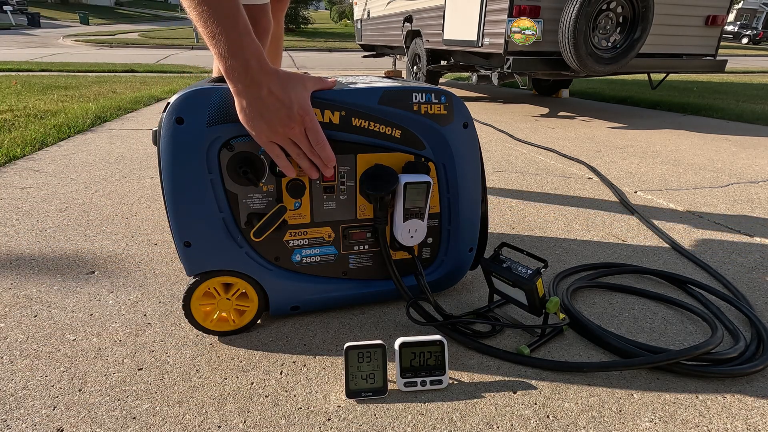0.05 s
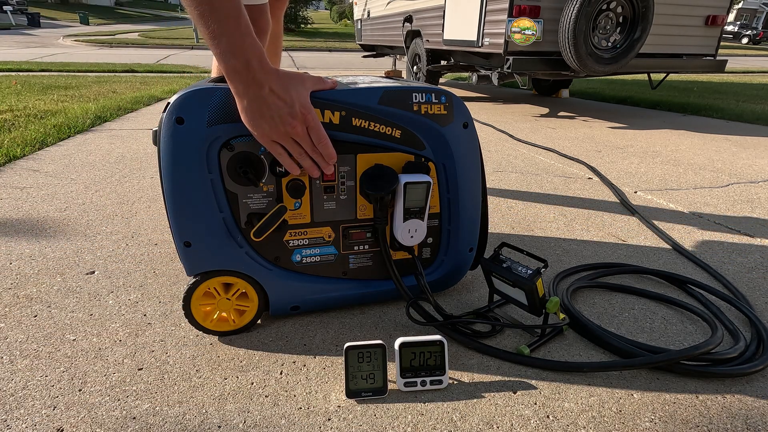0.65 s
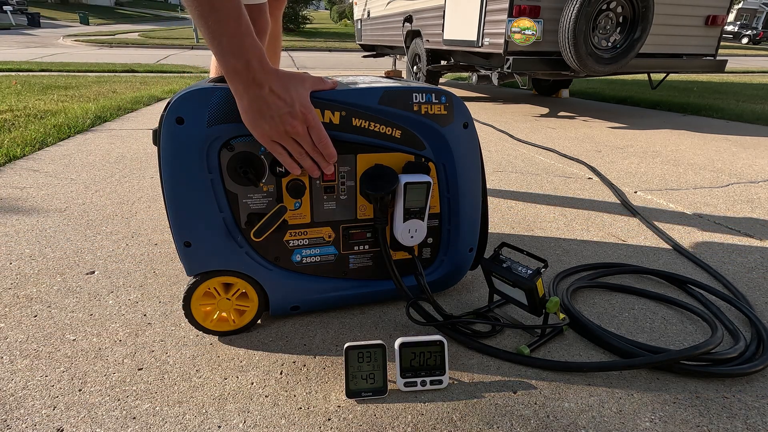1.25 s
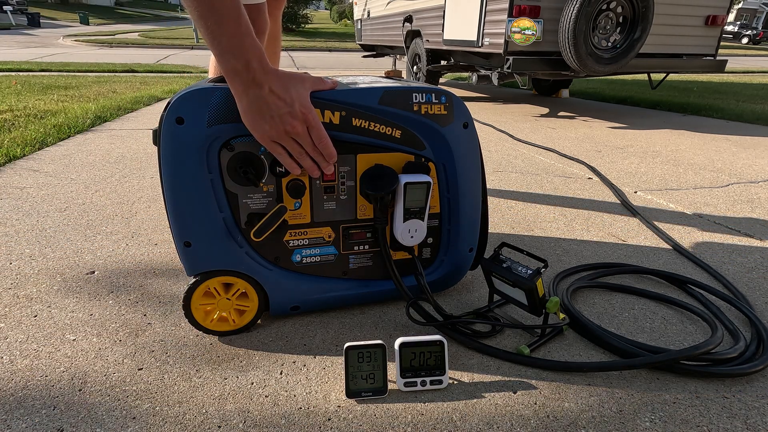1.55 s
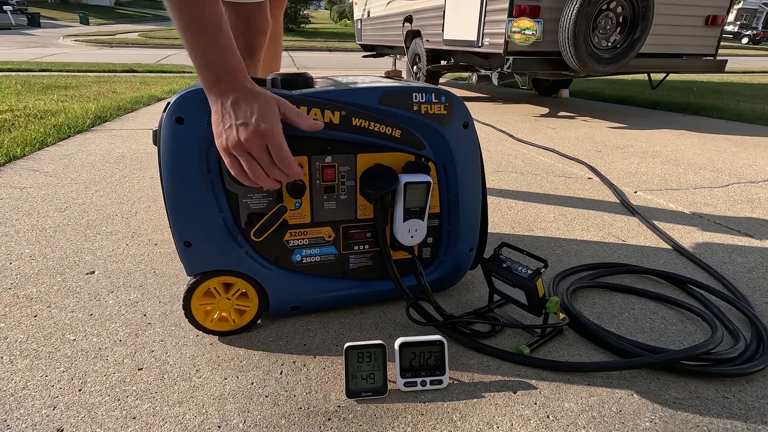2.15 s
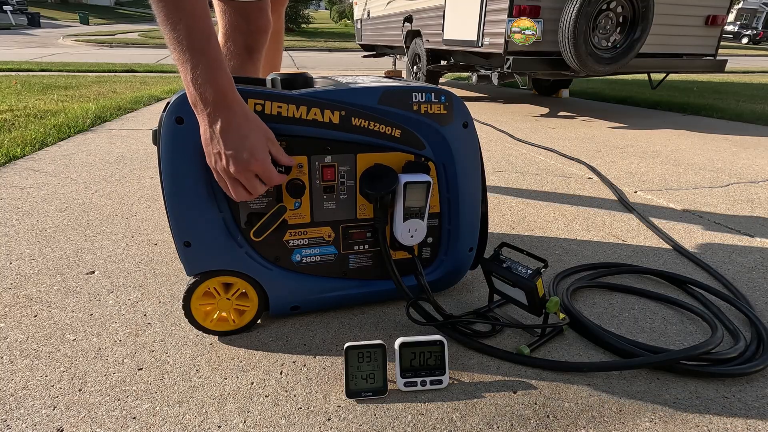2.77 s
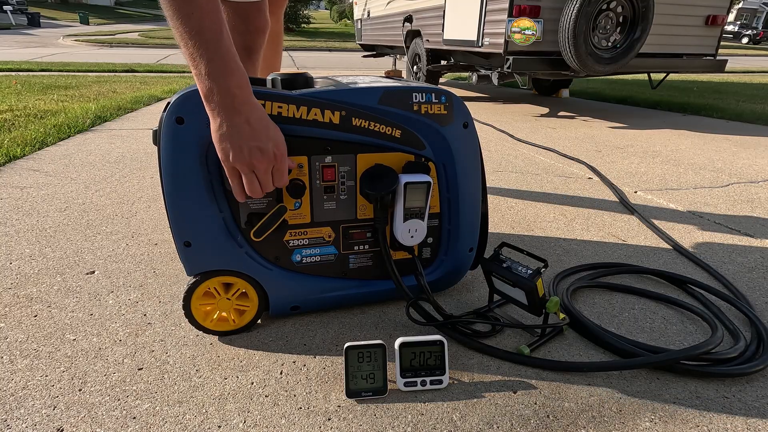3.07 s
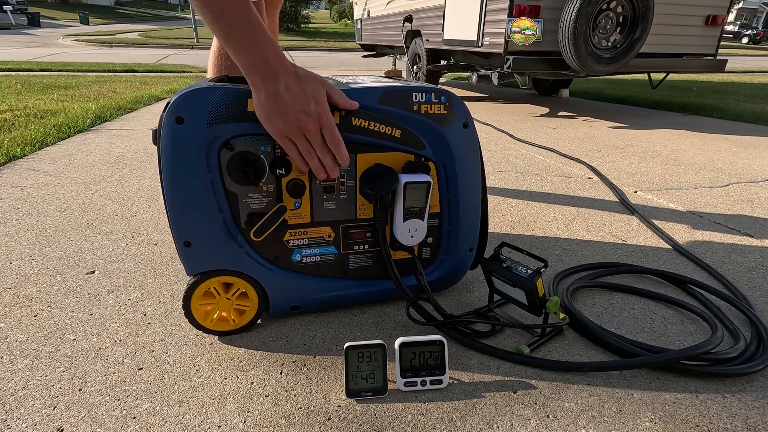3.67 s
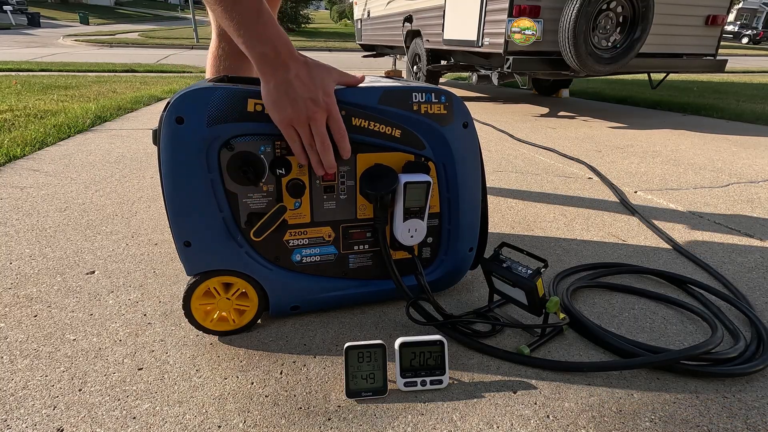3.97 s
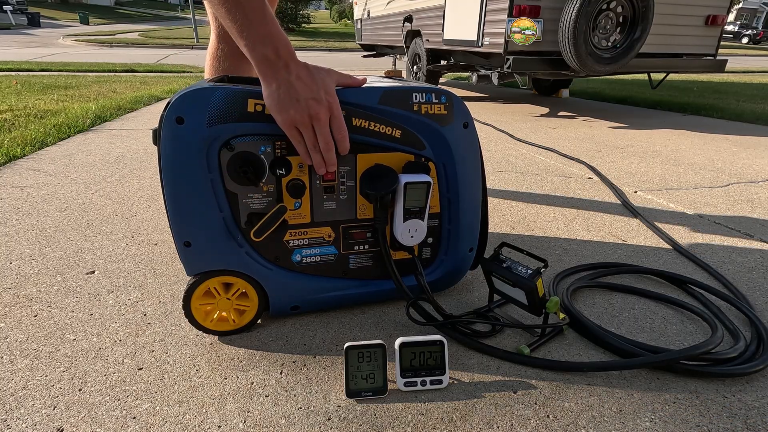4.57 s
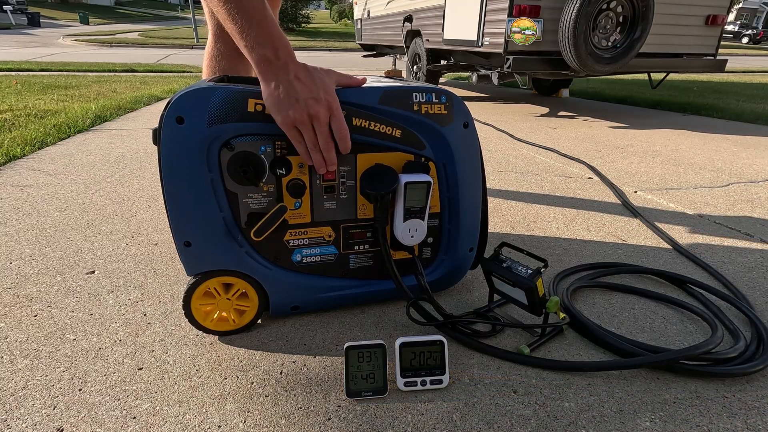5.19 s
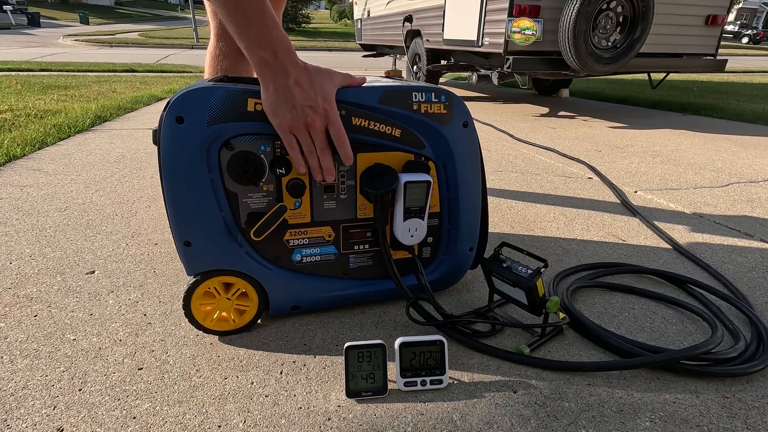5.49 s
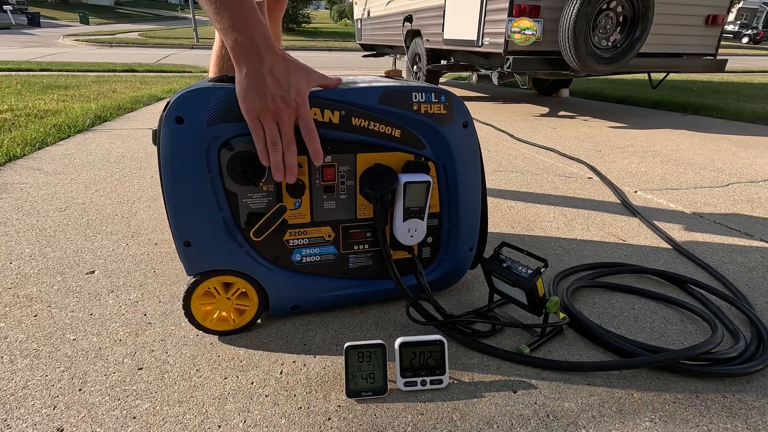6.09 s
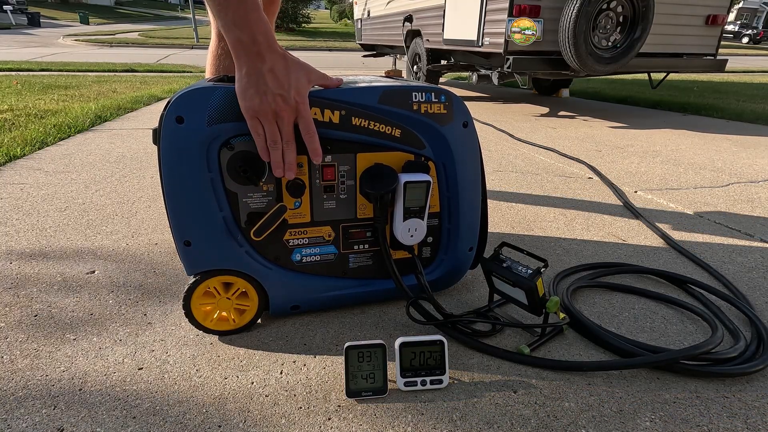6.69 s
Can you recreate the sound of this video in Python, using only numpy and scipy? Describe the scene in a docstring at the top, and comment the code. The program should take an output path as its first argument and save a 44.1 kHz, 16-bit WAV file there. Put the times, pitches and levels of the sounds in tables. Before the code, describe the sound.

A quiet outdoor hush opens the scene. At about 0.6 seconds a relay clicks and an electric starter engages with a knock, whining and rattling as it cranks a portable generator. The engine does not fire. The starter drops out around 2.1 seconds and the engine coasts down with slowing hollow puffs, soft thumps and valve clacks, stopping at about 4.2 seconds. Light wind gusts rumble on the microphone meanwhile, strongest near 3.3 seconds. At 4.5 seconds there is another click and knock, and the starter cranks again. The engine catches at about 5.2 seconds, with uneven exhaust pops until nearly 6 seconds, and settles briefly into a thumping idle with a light mechanical clatter. At 6.3 seconds a switch clicks and the engine speeds up, still running at the end, near 7 seconds.

```python
"""Out of a quiet outdoor hush a relay clicks and an electric starter whines and rattles, cranking a portable
four-stroke generator on a driveway. It fails to fire and coasts to a halt, puffing, as light gusts rumble.
At the second try it catches, pops and idles; a switch clicks and it speeds up. One crank angle times the
gas pulses that thump in the muffler, and the valve clacks and gear teeth that ring the housing."""
import sys
import numpy as np
from scipy import signal
from scipy.fft import rfft, irfft, next_fast_len
from scipy.io import wavfile
from scipy.ndimage import map_coordinates

SR = 44100
rng = np.random.default_rng(int(sys.argv[2]) if len(sys.argv) > 2 else 0)


def transcribe(signal):
    """Save signal, clipped to [-1, 1], as a 16-bit WAV file at the path in sys.argv[1]."""
    frames = np.atleast_2d(signal).T
    limited = np.clip(frames, -1, 1)
    pcm = np.round(limited * 32767).astype(np.int16)
    wavfile.write(sys.argv[1], SR, pcm)


N = 301644
TIME = np.arange(N) / SR

# the neighbourhood's steady hush: (frequency [Hz], density [dB])
HUSH_TONE = [(25, -4.5), (90, -4), (140, -4.5), (250, -16.5), (350, -17.5), (450, -25), (600, -24),
             (850, -31), (1400, -24.5), (2300, -29.5), (5400, -36.5), (8500, -44), (11500, -53.5),
             (15000, -55)]
# low rumble of breeze and engine: (frequency [Hz], density [dB])
RUMBLE_TONE = [(12, -16), (20, 1), (47, 1), (158, -7), (295, -16), (343, -15), (468, -28), (700, -35),
               (910, -62), (1540, -120)]
# wind buffeting a microphone port: (frequency [Hz], density [dB])
GUST_TONE = [(12, -38), (20, -1), (65, -0.5), (246, -7.5), (416, -18), (888, -38), (1500, -34), (1950, -70),
             (3300, -120)]
# gusts: (time [s], level [dB], rise [s], t60 [s])
WIND_GUSTS = [(2.38, -46, 0.051, 0.71), (2.85, -57.5, 0.11, 2.3), (3.26, -35.5, 0.013, 1.57),
              (3.42, -40.5, .03, 0.9), (3.59, -46, .03, 0.66), (4.38, -42.5, 0.033, 1.1)]
# deep swell of the breeze: (frequency [Hz], density [dB])
SWELL_TONE = [(12, -20), (25, 6), (55, 4), (150, -8.5), (400, -52)]

# resonances of the engine and its housing: (frequency [Hz], width [Hz], lift at full ring [dB])
HOUSING_MODES = [(531.5, 42, 8.5), (619.7, 16, 13), (735.5, 29, 7.5), (1064, 52, 9), (1266, 56, 11.5),
                 (1521, 109, 9.5), (1878, 66, 5.5), (2025, 57, 5.5), (2351, 53, 11.5), (2670, 25, 2),
                 (2785, 58, 5.5), (2871, 64, 9), (3040, 62, 9), (3295, 50, -7.5), (3410, 94, 7),
                 (3680, 124, 6)]
# crank, coast to a halt, crank again, idle, speed up: (time [s], speed [cycles/s])
ENGINE_SPEED = [(0.66, 0.0), (0.8, 2.96), (1.05, 5.53), (1.3, 7.01), (1.95, 8.59), (2.31, 7.39),
                (3.47, 3.8), (4.21, 0.0), (4.5, 0.0), (4.62, 2.94), (5.13, 7.82), (5.39, 12.94),
                (5.71, 17.86), (6.03, 17.25), (6.4, 18.58), (6.84, 29.02)]
# blend of engine states: (time [s], drive [0 cranked, 1 idling, 2 and up accelerating])
ENGINE_DRIVE = [(5.03, 0.32), (5.25, 0.44), (5.6, 0.94), (6.29, 1.04), (6.35, 2.8)]
# force of combustion: (time [s], load [dB over a quiet idle])
ENGINE_LOAD = [(5.0, 7.5), (5.26, 14.5), (5.42, 7), (5.72, 6.5), (5.92, 1), (6.28, 1), (6.5, 5.5),
               (6.84, 5)]

# relay and switch clicks: (time [s], level [dB], t60 [s])
SWITCH_CLICKS = [(0.64, -36, 0.032), (.652, -38, 0.1), (4.474, -34, 0.026), (4.486, -42.5, 0.25),
                 (6.309, -33, 0.042)]
# colour of a click: (frequency [Hz], gain [dB])
CLICK_TONE = [(150, -6), (700, -1.5), (1500, 2.5), (3000, 0), (5000, -11.5), (9000, -25), (14500, -28)]
# the starter gear slams in, is thrown about, drops out: (time [s], rattle [dB], t60 [s], knock [dB])
GEAR_JOLTS = [(0.662, -33.5, 0.2, -28.5), (0.69, -55, 0.055, -41), (1.824, -32, 0.043, -50),
              (1.95, -32, .06, -50), (2.058, -41, .06, -56), (4.502, -34.5, 0.19, -30.5),
              (4.525, -49, 0.09, -43), (5.139, -32.5, 0.067, -38.5)]
# dull body of a jolt: (frequency [Hz], gain [dB])
KNOCK_TONE = [(40, -35.5), (170, 3.5), (350, -6.5), (700, -9), (1100, -11.5), (2500, -47), (8000, -82)]
# last air let out as the piston stops and rocks back: (time [s], hiss [dB], width [s], hollow ring [dB])
PISTON_SIGHS = [(3.995, -63.5, 0.02, -71), (4.245, -64, 0.024, -66)]
# hollow ring of a puff: (frequency [Hz], density [dB])
HOLLOW_TONE = [(600, -75), (880, -22), (1010, 16), (1150, 5), (1700, -48)]
# valve clacks of one cycle: (angle [cycles], t60 [s], unfired level [dB], running level [dB])
VALVE_CLACKS = [(.267, .055, -39.5, -58.5), (.447, .05, -52, -58.5), (.512, 0.064, -48, -60),
                (.625, .06, -51, -57), (.79, 0.07, -52, -57.5)]
# colour of a valve's clack and hiss: (frequency [Hz], gain [dB])
VALVE_TONE = [(300, -27), (600, -12), (1050, -0.5), (1550, -1.5), (2050, -3.5), (3000, -6), (3900, -11.5),
              (5300, -20), (6800, -23.5), (8500, -41), (11000, -47), (14500, -70)]
# colour of the fine clatter: (frequency [Hz], gain [dB])
CLATTER_TONE = [(260, -25.5), (480, -7), (850, -2), (1100, -2.5), (1520, -4), (1900, -8.5), (3000, -10),
                (3900, -13.5), (5300, -25.5), (7500, -26.5), (11000, -37.5), (14500, -60)]

# the starter is powered: (on [s], off [s], level [dB], spin-down level [dB])
STARTER_RUNS = [(.665, 2.108, -36, -60), (4.496, 5.15, -37, -46)]
# the gears go slack as the piston passes its top: (angle [cycles], loudness [relative])
GEAR_THROB = [(.05, -0.84), (.13, 1), (.38, -0.78), (.45, 0.73), (.55, 0.46), (.7, 0.88), (.92, -1.85)]
# colour of the gear rattle: (frequency [Hz], gain [dB])
RATTLE_TONE = [(100, -20), (300, -13.5), (520, -2), (850, -1), (1300, -2), (2200, 0), (3300, 1), (3900, 1),
               (4400, -7), (5100, -17), (6500, -15.5), (8400, -22), (10000, -26), (14500, -43)]
# the starter gear's own ring: (frequency [Hz], density [dB])
SING_TONE = [(3000, -37), (3500, -8), (3690, 3), (3880, -13), (4300, -56), (5600, -39), (6450, -17),
             (7600, -37), (9800, -25.5), (14000, -46)]
# how the housing radiates the whine: (frequency [Hz], gain [dB])
WHINE_COLOUR = [(170, 0.5), (450, -3), (660, 5), (820, -3), (1250, 2.5), (15000, -3)]

# gas pulses: crankcase push, firing, exhaust, its overtone, muffler ring, intake, valve closing
# (angle [cycles], ring [Hz], t60 [s], polarity [sign], cranked [dB], idling [dB], accelerating [dB])
GAS_PULSES = [(-.015, 61.1, 0.029, 1, 0.5, -16, -14), (-.028, 166, .022, -1, -44, 5, 6.5),
              (.26, 181, .018, -1, 7, -14.5, 3.5), (.256, 316.6, 0.037, -1, -35, -20.5, -6.5),
              (.305, 211, 0.069, -1, -23, -7, -10.5), (.56, 110, .03, 1, -5, -16.5, -30),
              (0.658, 160, 0.029, 1, -37, -0.5, -2.5)]
# rush of exhaust gas: (frequency [Hz], density [dB])
RUSH_TONE = [(30, -14), (120, -10), (210, 9), (320, -8), (500, -9.5), (800, -15.5), (1600, -33.5),
             (6000, -74)]
# uneven firing pops in the exhaust: (time [s], level [dB])
EXHAUST_POPS = [(5.21, -31.5), (5.3, -32), (5.462, -42), (5.539, -39), (5.608, -37), (5.68, -27),
                (5.746, -29.5), (5.807, -34), (5.863, -39)]
# colour of a pop: (frequency [Hz], density [dB])
POP_TONE = [(200, -27), (420, 8), (560, 4), (760, -2.5), (1000, -16), (1600, -32), (3000, -16.5),
            (12000, -77)]

# stereo spread of the scatter: (frequency [Hz], side gain [dB])
SCATTER_TONE = [(30, -23), (200, -28.5), (500, -13.5), (1000, -12), (2000, -8), (4000, -4), (8000, 1),
                (13000, 1)]
# the stereo image closes: (time [s], side gain [dB])
IMAGE_WIDTH = [(3.75, -4), (4.15, -38.5)]

BREEZE_DB, RIGHT_PORT_DB = -64, 4  # the gusts hit the right port harder
PUFF_ANGLE, PUFF_WIDTH = 0.2054, 0.024  # in cycles
PUFF_DB, HOLLOW_DB = -48, -43.5
TEETH_PER_CYCLE, ENGAGE_S, RELEASE_S, SPIN_DOWN_T60 = 178, 0.013, 0.085, 1.7
TREBLE_DB, SING_DB, WHINE_DB = 7.5, -11.5, -7  # trims on the starter's layers
OVERRUN_SPEED, THROB_DB = 8.74, 5  # near this speed [cycles/s] the engine overruns the starter
THUMP_DB, CLATTER_DB, RUSH_DB, RUMBLE_DB = -15, -59, -46, -45  # base levels, before speed and load
SHAKE_DB, SHAKE_SPEED = -44, 22.6  # the case's shake has this level at this speed [cycles/s]
SCATTER_DB, TOP_HZ = -5.5, 14900


def amp(db):
    """Decibels to gain."""
    return 10 ** (np.asarray(db) / 20)


def unit(x):
    """Scale to rms 1."""
    return x / np.sqrt(np.mean(x ** 2) + 1e-20)


def along(points, hz):
    """Read a curve on a log frequency axis."""
    f, v = np.transpose(points)
    return np.interp(np.log(hz + 1), np.log(f + 1), v)


def curve(points):
    """An automation lane, one value a sample."""
    return np.interp(TIME, *np.transpose(points))


def wobble(rate):
    """A smooth random curve, rate knots a second."""
    return map_coordinates(rng.standard_normal(int(N * rate / SR) + 4), [TIME * rate])


def filtered(x, gain):
    """Equalise x with a gain that depends on frequency."""
    m = next_fast_len(N + SR // 4)
    return irfft(rfft(x, m) * gain(np.fft.rfftfreq(m, 1 / SR)), m)[..., :N]


def noise(spectrum):
    """Coloured noise of rms 1."""
    return unit(filtered(rng.standard_normal(N), lambda hz: amp(along(spectrum, hz))))


def impacts(rate, hiss):
    """Tiny random blows, rate a second, over a smooth hiss; rms 1."""
    blows = (rng.random(N) < rate / SR) * rng.standard_normal(N)
    return unit(unit(blows) + hiss * rng.standard_normal(N))


def decay(s, t60, attack):
    """Envelope of a blow at time s."""
    t = np.maximum(TIME - s, 0)
    return np.exp(-np.log(1000) * t / t60) * (1 - np.exp(-t / attack))


def bell(offset, width):
    """A smooth rise and fall around zero offset."""
    return np.exp(-.5 * (offset / width) ** 2)


def grows(speed, knee, steep):
    """Gain that rises as a power of speed and levels off at 1 above the knee."""
    r = np.abs(speed / knee) ** steep
    return r / (1 + r)


def passes(angle, at):
    """The samples at which the crank passes an angle of its cycle."""
    return np.flatnonzero(np.diff(np.floor(angle - at)) > 0)


def housing(x, spectrum, ring):
    """Blows x ring the housing: a causal filter of unit energy; ring scales its resonances."""
    hz = np.fft.rfftfreq(4096, 1 / SR)
    lift = sum(db / (1 + (2 * (hz - f) / width) ** 2) for f, width, db in HOUSING_MODES)
    cepstrum = irfft(np.log(amp(along(spectrum, hz) + ring * lift)))
    cepstrum[1:len(hz)] *= 2  # minimum phase: the ring follows the blow
    cepstrum[len(hz):] = 0
    response = irfft(np.exp(rfft(cepstrum)))
    return signal.fftconvolve(x, response / np.linalg.norm(response))[:N]


def neighbourhood():
    """A steady bed of outdoor hush."""
    return amp(-62) * noise(HUSH_TONE)


def wind():
    """A breeze with one slow swell rumbles on both microphone ports; gusts buffet each on its own."""
    swell = amp(-50) * bell(TIME - 3.54, width=0.74) * noise(SWELL_TONE)
    breeze = (noise(RUMBLE_TONE) * amp(BREEZE_DB) + swell) * amp(1.8 * wobble(11))
    gust = sum(amp(db) * decay(s, t60, rise) for s, db, rise, t60 in WIND_GUSTS)
    buffets = [gust * noise(GUST_TONE) * amp(db + 2.2 * wobble(24.97)) for db in (0, RIGHT_PORT_DB)]
    return breeze + np.array(buffets)


def scatter(mid):
    """The side signal: scatter off the ground and walls reaches left and right differently."""
    t = np.arange(SR // 8) / SR
    tail = rng.standard_normal(len(t)) * np.exp(-t / 0.025)
    reflections = signal.fftconvolve(mid, tail / np.linalg.norm(tail))[:N]
    return filtered(reflections, lambda hz: amp(SCATTER_DB + along(SCATTER_TONE, hz)))


def switches():
    """Relay and switch snap, lightly ringing the housing."""
    click = sum(amp(db) * decay(s, t60, attack=0.00099) for s, db, t60 in SWITCH_CLICKS)
    return housing(click * impacts(rate=3000, hiss=1.0), CLICK_TONE, ring=0.28)


def jolts():
    """The starter gear jolts the housing: a bright rattle on a dull knock."""
    rattle = sum(amp(db) * decay(s, t60, attack=0.0013) for s, db, t60, _ in GEAR_JOLTS)
    knock = sum(amp(db) * decay(s, t60=0.22, attack=0.0018) for s, _, _, db in GEAR_JOLTS)
    return (housing(rattle * impacts(rate=2300, hiss=1.0), RATTLE_TONE, ring=0.8)
            + housing(knock * impacts(rate=2500, hiss=0.94), KNOCK_TONE, ring=0.17))


def puffs(speed, angle, drive):
    """Unfired, the cylinder squeezes a hollow hiss through a valve once a cycle, and sighs as it stops."""
    offset = (angle - PUFF_ANGLE + .5) % 1 - .5
    puff = bell(offset, PUFF_WIDTH) * grows(speed, knee=3.0, steep=6.7) * np.clip(1 - drive, 0, 1)
    hiss, hollow = amp(PUFF_DB) * puff, amp(HOLLOW_DB) * puff
    for s, hiss_db, width, hollow_db in PISTON_SIGHS:
        sigh = bell(TIME - s, width)
        hiss += amp(hiss_db) * sigh
        hollow += amp(hollow_db) * sigh
    hollow *= noise(HOLLOW_TONE)
    return housing(hiss * impacts(rate=3000, hiss=1.2), VALVE_TONE, ring=0.52) + hollow


def valves(speed, angle, drive, load_db):
    """Valves clack at set crank angles over a bed of fine clatter; both ring the housing."""
    clacks, t = np.zeros(N + SR), np.arange(SR // 8) / SR
    for at, t60, *states_db in VALVE_CLACKS:
        starts = passes(angle, at)
        shape = np.exp(-np.log(1000) * t / t60) * (1 - np.exp(-t / 0.0016))
        for i, size_db in zip(starts, 1.1 * rng.standard_normal(len(starts))):
            clacks[i:i + len(t)] += amp(np.interp(drive[i], [0, 1], states_db) + size_db) * shape
    clacks = clacks[:N] * grows(speed, knee=1.4, steep=5.1) * amp(.5 * load_db)
    bed_db = CLATTER_DB + 0.87 * load_db + 3.2 * np.clip(drive, 0, 1) + 1.8 * wobble(90)
    bed = amp(bed_db) * grows(speed, knee=5.1, steep=1.94)
    return (housing(impacts(rate=3000, hiss=1.4) * clacks, VALVE_TONE, ring=0.65)
            + housing(impacts(rate=1500, hiss=1.17) * bed, CLATTER_TONE, ring=0.43))


def gear_rattle(speed, angle, mesh, powered):
    """The starter's teeth rattle the housing, brighter with speed, throbbing as the engine overruns."""
    overrun = np.clip(speed / OVERRUN_SPEED, 0, 1.1)
    slack = np.interp(angle, *np.transpose(GEAR_THROB), period=1)
    throb = amp(THROB_DB * overrun ** 7 * (slack - 0.34))
    easing = amp(-3.5 * overrun ** 18)
    spin_down = sum(amp(db) * decay(off - RELEASE_S, SPIN_DOWN_T60, attack=0.024)
                    for _, off, _, db in STARTER_RUNS)
    body = powered * throb * easing * grows(speed, knee=1.52, steep=1.65)
    treble = body * amp(TREBLE_DB) * grows(speed, knee=5.2, steep=2.2)
    blows = impacts(rate=2500, hiss=0.98) * (1 + 0.13 * np.cos(mesh)) * amp(1.5 * wobble(110) - 2.5)
    crossover = lambda hz: 1 / (1 + (hz / 4800) ** 8)
    lows = filtered(housing(blows * (body + spin_down), RATTLE_TONE, ring=0.94), crossover)
    highs = filtered(housing(blows * treble, RATTLE_TONE, ring=0.99), lambda hz: 1 - crossover(hz))
    # at speed, while still under load, the gear itself sings in short flares
    loaded = 1 - grows(speed, knee=8.8, steep=22)
    sing = noise(SING_TONE) * treble * loaded * amp(SING_DB + 3.8 * wobble(40))
    return lows + highs + sing


def starter(speed, angle):
    """Gear teeth rattle and whine at the mesh rate; the whine fades as speed rises and torque drops."""
    jitter = speed / 4 * (.9 * wobble(60) + .45 * wobble(260))
    mesh = 2 * np.pi * TEETH_PER_CYCLE * angle + jitter
    powered = sum(amp(db) * np.clip(np.minimum((TIME - on) / ENGAGE_S, (off - TIME) / RELEASE_S), 0, 1)
                  for on, off, db, _ in STARTER_RUNS)
    rattle = gear_rattle(speed, angle, mesh, powered)
    tone = np.sin(mesh) + 0.46 * np.sin(2 * mesh) + 0.23 * np.sin(3 * mesh) + 0.16 * np.sin(4 * mesh)
    torque = 1 - grows(speed, knee=5.2, steep=3.25)
    whine = tone * powered * torque * amp(WHINE_DB + 2.96 * wobble(45) + 1.8 * wobble(170))
    return rattle + housing(whine, WHINE_COLOUR, ring=1.0)


def thumps(speed, angle, drive, load_db):
    """Each gas pulse rings the muffler or the air box; speed, drive and load set its punch."""
    level = amp(THUMP_DB + 0.21 * load_db) * grows(speed, knee=6.52, steep=2.23)
    out, t = np.zeros(N + SR), np.arange(SR // 8) / SR
    # the muffler needs a few milliseconds to fill, which softens the first swing
    fill = (1 - np.exp(-t / 0.0026)) ** 2
    for at, hz, t60, polarity, *states_db in GAS_PULSES:
        starts = passes(angle, at)
        ring = polarity * np.sin(2 * np.pi * hz * t) * np.exp(-np.log(1000) * t / t60) * fill
        for i, size_db in zip(starts, 0.77 * rng.standard_normal(len(starts))):
            strength = np.interp(drive[i], [0, 1, 2], amp(states_db))
            out[i:i + len(t)] += strength * level[i] * amp(size_db) * ring
    return out[:N]


def engine(speed, angle, drive, load_db):
    """Thumps, the surging rush of exhaust gas and its pops, over the rumble and shake of the case."""
    surge_db = 1.9 * np.cos(2 * np.pi * (angle - .42))
    unfired_db = -6 * np.clip(1 - drive, 0, 1)
    rush_db = RUSH_DB + load_db + surge_db + unfired_db
    rush = noise(RUSH_TONE) * amp(rush_db) * grows(speed, knee=8.63, steep=2.95)
    pops = noise(POP_TONE) * sum(amp(db) * decay(s, t60=0.043, attack=0.00051) for s, db in EXHAUST_POPS)
    rumble = noise(RUMBLE_TONE) * amp(RUMBLE_DB + 0.51 * load_db) * grows(speed, knee=5.64, steep=2.2)
    # the piston shakes the case once a turn, two turns to a cycle
    shake = amp(SHAKE_DB) * (speed / SHAKE_SPEED) ** 2 * np.sin(2 * np.pi * 2 * angle)
    return thumps(speed, angle, drive, load_db) + rush + pops + rumble + shake


def scene():
    """One speed curve turns the crank; the generator sits in the centre, with scatter and wind around."""
    speed, drive, load_db = curve(ENGINE_SPEED), curve(ENGINE_DRIVE), curve(ENGINE_LOAD)
    angle = .245 + np.cumsum(speed) / SR  # in cycles
    hush = neighbourhood()
    mid = (engine(speed, angle, drive, load_db) + valves(speed, angle, drive, load_db)
           + starter(speed, angle) + switches() + jolts() + puffs(speed, angle, drive) + hush)
    side = scatter(mid)
    return np.array([mid + side, mid - side]) + wind()


def record(dry):
    """The image narrows almost to mono after the strongest gust; the very top is cut off."""
    mid = (dry[0] + dry[1]) / 2
    side = (dry[0] - dry[1]) / 2 * amp(curve(IMAGE_WIDTH))
    return filtered(np.array([mid + side, mid - side]), lambda hz: hz < TOP_HZ)


dry = scene()
out = record(dry)
transcribe(out)
```